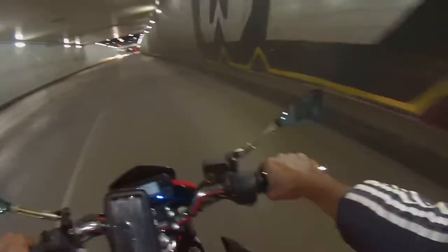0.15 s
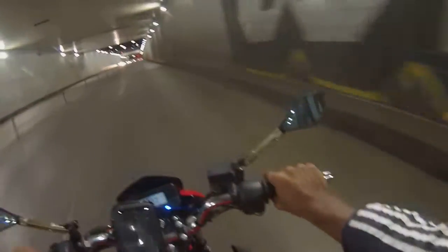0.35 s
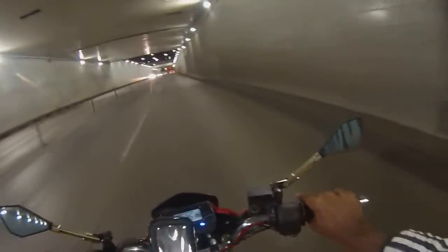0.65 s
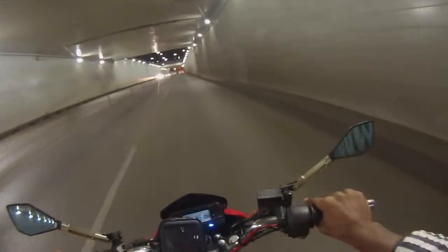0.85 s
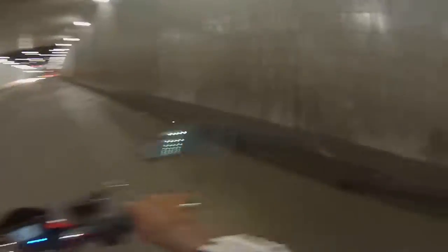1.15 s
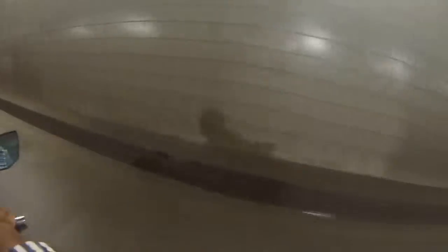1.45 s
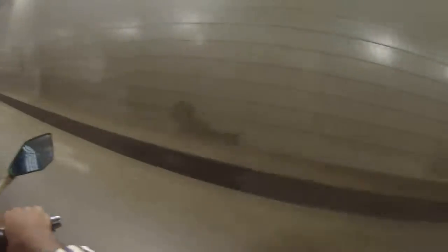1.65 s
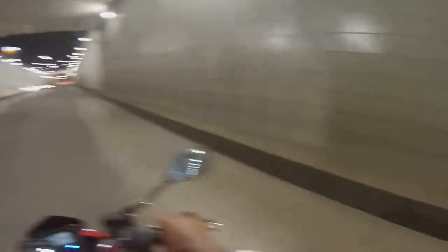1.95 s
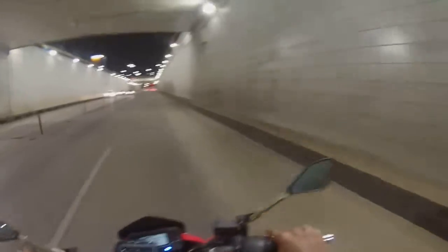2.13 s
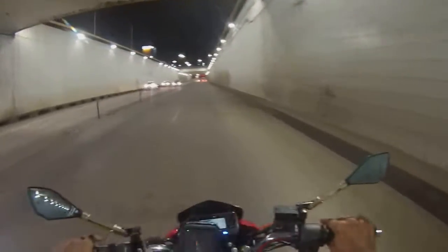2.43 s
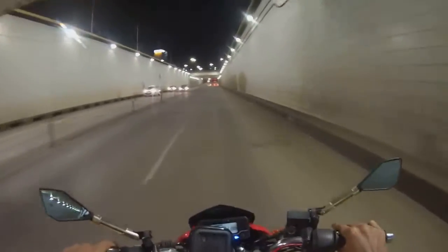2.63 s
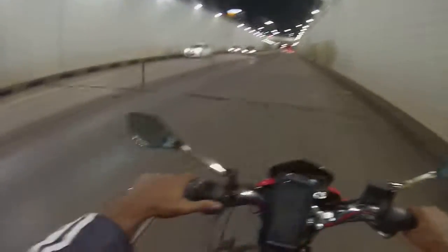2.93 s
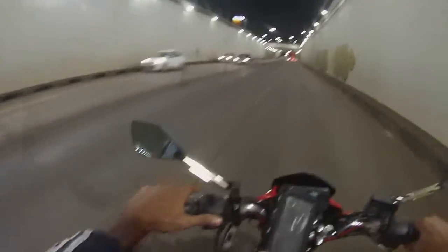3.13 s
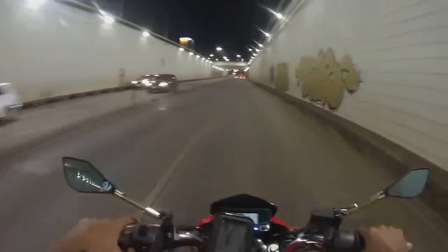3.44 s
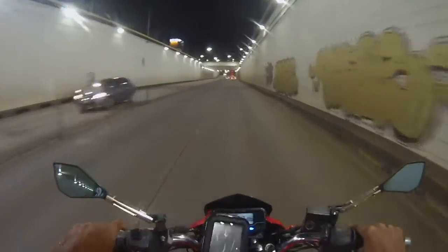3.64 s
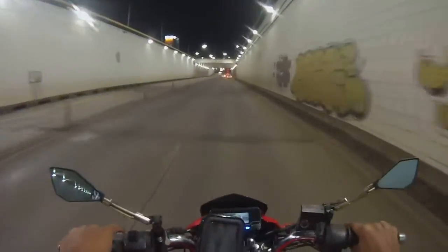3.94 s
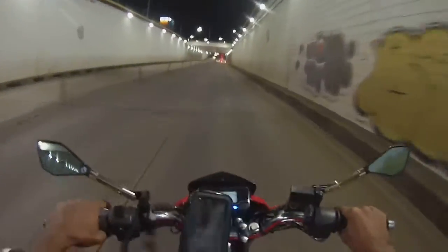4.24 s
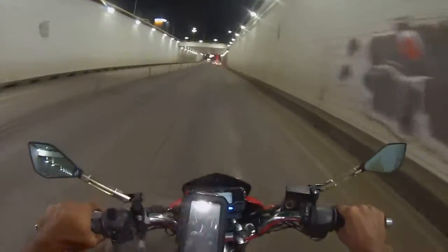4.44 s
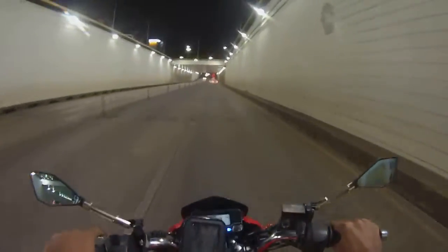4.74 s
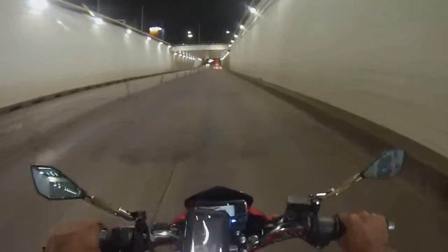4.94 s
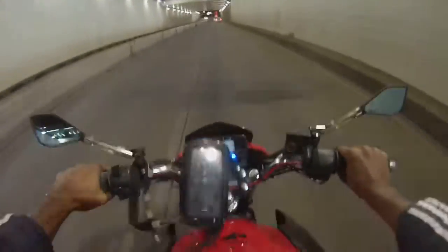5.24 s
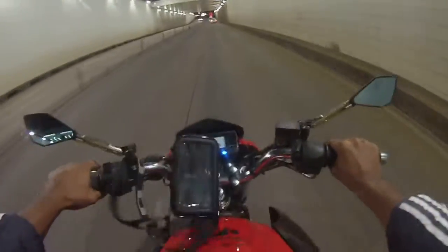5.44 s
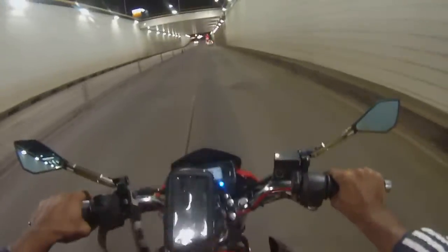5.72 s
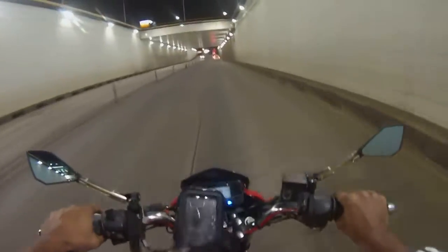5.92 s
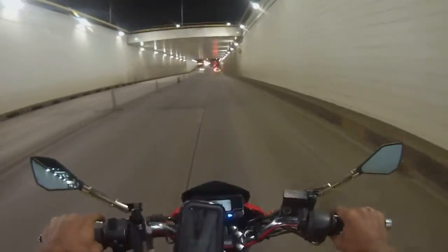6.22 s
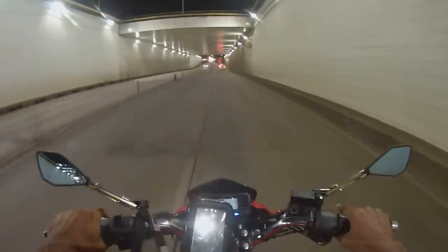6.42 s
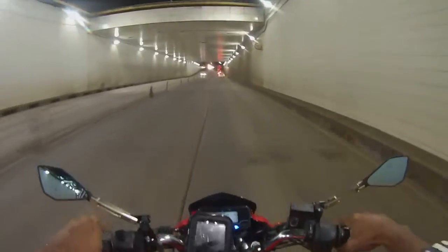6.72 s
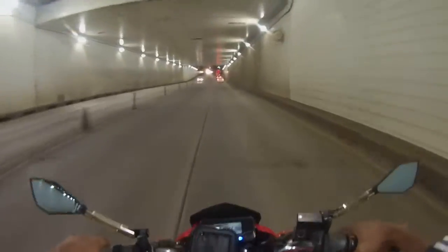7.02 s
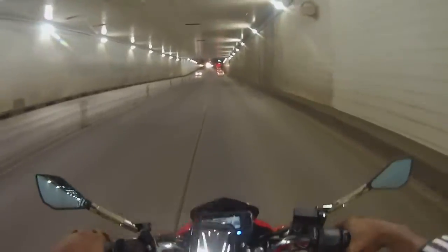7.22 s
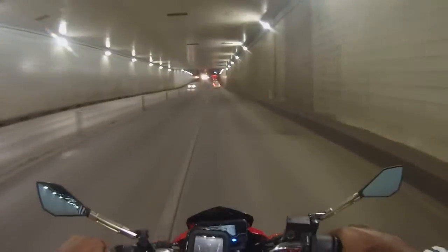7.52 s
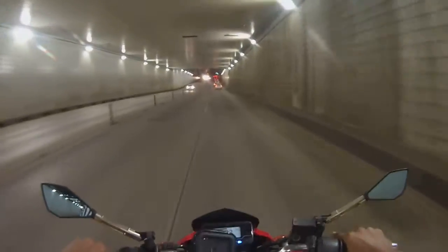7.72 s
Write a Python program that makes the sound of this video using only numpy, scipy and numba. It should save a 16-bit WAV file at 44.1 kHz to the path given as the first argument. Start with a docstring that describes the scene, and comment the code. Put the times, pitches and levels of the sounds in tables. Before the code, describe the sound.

Close, bass-heavy, muffled ride sound: a throbbing exhaust dips, the throttle is blipped and the note swells for about a second before dropping again. Then it chugs along evenly, creeping only slightly higher. Faint valve clatter and thin gear whine sit beneath; from the third second strong gusts thump and crowd the enclosed microphone, pumping its level.

```python
"""A single-cylinder motorcycle in a walled underpass, heard by a helmet camera in a closed housing.
The firing rate sags, then the rider blips the throttle with the clutch in: 41 to 80 Hz by 0.8 s, held to 1.25 s,
back to 41 Hz by 1.9 s. He rides on at 40-46 Hz to the end. Exhaust harmonics ring the pipe and return from the walls.
Shaped noise makes faint valve gear, whine and roar throughout; strong low gusts crowd in from 2.6 s. Pulses make
the buffets and the camera's ticks; a fast level control ducks at each overload."""
import sys
import numpy as np
from scipy import signal
from scipy.fft import rfft, irfft
from scipy.io import wavfile
from scipy.ndimage import uniform_filter1d
from numba import njit

SR = 44100
rng = np.random.default_rng(int(sys.argv[2]) if len(sys.argv) > 2 else 0)


def wav_out(sig):
    """Save sig, one row per channel (or a flat mono array), as 16-bit PCM at SR to the path in sys.argv[1]."""
    wavfile.write(sys.argv[1], SR, np.round(np.clip(np.atleast_2d(sig).T, -1, 1) * 32767).astype(np.int16))


N = 347067


def undb(db):
    """Decibels to amplitude ratio."""
    return 10 ** (np.asarray(db) / 20)


def level(x, rms_db):
    """Scale to an RMS level."""
    return x * undb(rms_db) / np.sqrt(np.mean(x ** 2))


def curves(table):
    """Columns of a table joined by straight lines in time."""
    time_s, *columns = np.transpose(table)
    return [np.interp(np.arange(N) / SR, time_s, column) for column in columns]


def colour(x, points, size=8192):
    """Causal minimum-phase filter through (freq_hz, gain_db) points, built by folding the cepstrum."""
    freq_hz, gain_db = np.transpose(points)
    grid_hz = np.arange(size // 2 + 1) * SR / size + 1
    grid_db = np.interp(np.log(grid_hz), np.log(freq_hz), gain_db)
    cepstrum = irfft(np.log(undb(grid_db)))
    cepstrum[1:size // 2] *= 2
    cepstrum[size // 2 + 1:] = 0
    impulse = irfft(np.exp(rfft(cepstrum)))
    return signal.fftconvolve(x, impulse)[:N]


def ring(x, hz, width_hz):
    """One resonance, gain 1 at its centre."""
    return signal.lfilter(*signal.iirpeak(hz, hz / width_hz, SR), x)


def noise():
    """White noise, RMS near 1."""
    return rng.standard_normal(N)


def walk(rate_hz):
    """Random levels held 1 / rate_hz and slewed twice; spread near 1."""
    hold = int(SR / rate_hz)
    steps = np.repeat(rng.standard_normal(N // hold + 1), hold)
    return 1.824 * uniform_filter1d(uniform_filter1d(steps, hold), hold)[:N]


def ticks():
    """Camera ticks: sudden steps that relax at once and ring briefly near 2.8 kHz; faint ones fall at random."""
    # clearest ticks, most at loud peaks: start_s, peak_db (in the band around the knock)
    clear_ticks = [(0.0697, -43), (0.158, -44), (0.2274, -45), (0.251, -47), (0.3385, -48), (0.3943, -48),
                   (0.4329, -50), (0.4483, -50), (0.473, -44), (0.5882, -50), (0.6267, -47), (0.6428, -48),
                   (0.6857, -48), (0.7124, -47), (0.8031, -48), (0.819, -48), (0.8427, -48), (0.8928, -48),
                   (0.9051, -47), (1.0195, -46), (1.1446, -44), (1.209, -47), (1.246, -48), (1.2892, -44),
                   (1.2993, -49), (1.3137, -48), (1.3514, -47), (1.3771, -47), (1.4021, -47), (1.6093, -49),
                   (1.7059, -49), (1.7819, -47), (1.8027, -50), (1.8621, -48), (1.9045, -43), (1.9826, -49),
                   (2.0077, -46), (2.089, -47), (2.1567, -49), (2.1781, -45), (2.1922, -48), (2.2731, -40),
                   (2.3229, -50), (2.5194, -47), (2.5422, -45), (2.6415, -41), (2.6722, -50), (2.6895, -40),
                   (2.6975, -48), (2.809, -49), (2.8573, -39), (3.1886, -50), (3.2398, -49), (3.4556, -49),
                   (3.5265, -43), (3.5513, -48), (3.7166, -41), (4.0205, -48), (4.0673, -47), (4.1344, -49),
                   (4.1837, -46), (4.1928, -49), (4.389, -47), (4.4035, -47), (4.4559, -47), (4.5288, -48),
                   (4.5644, -44), (4.5892, -45), (4.6879, -48), (4.7799, -49), (4.8017, -48), (4.8245, -45),
                   (4.8466, -43), (4.9149, -48), (4.9803, -41), (5.0016, -47), (5.0296, -49), (5.0705, -42),
                   (5.1158, -45), (5.138, -42), (5.227, -37), (5.32, -50), (5.3478, -46), (5.4007, -44),
                   (5.4295, -37), (5.4716, -46), (5.4925, -44), (5.511, -48), (5.7559, -41), (5.8256, -48),
                   (5.8441, -46), (5.9538, -48), (5.9741, -43), (5.9977, -47), (6.0385, -49), (6.1911, -44),
                   (6.2643, -45), (6.3723, -46), (6.4569, -47), (6.5312, -49), (6.5807, -46), (6.6255, -50),
                   (6.6673, -44), (6.7784, -46), (6.7981, -49), (6.8457, -47), (6.8663, -42), (6.983, -49),
                   (6.9987, -49), (7.0449, -42), (7.1005, -49), (7.133, -46), (7.3086, -47), (7.3514, -50),
                   (7.4382, -49), (7.5553, -46), (7.6008, -47), (7.7698, -46), (7.791, -44), (7.8396, -42)]
    faint_count, faint_min_db, faint_max_db = 110, -61.5, -55.5
    decay_s, knock_hz, knock_width_hz, edge_share = 0.00025, 2800, 3200, 0.45
    band_hz = 1500  # width of each of two resonances in which peaks are given

    hits = np.zeros(N)
    start_s, peak_db = np.transpose(clear_ticks)
    hits[(start_s * SR).astype(int)] = undb(peak_db) * rng.choice([-1, 1], len(start_s))
    faint_at = (rng.random(faint_count) * N).astype(int)
    hits[faint_at] += undb(rng.uniform(faint_min_db, faint_max_db, faint_count))

    t = np.arange(-100, 100) / SR
    step = np.sign(t) * np.exp(-abs(t) / decay_s)
    knock = ring(step, knock_hz, knock_width_hz) + edge_share * step
    core = ring(ring(knock, knock_hz, band_hz), knock_hz, band_hz)
    return np.convolve(hits, knock / abs(core).max(), "same")


def wind():
    """Low gusts and a flickering roar of coloured noise, and sudden buffets that push on the housing."""
    # low wind spectrum: freq_hz, relative_db
    gust_colour = [(7.1, -36), (12, -4), (75, 6), (110, -1.5), (140, -39), (240, -120)]
    # wind and tyres between the walls, spectrum: freq_hz, relative_db
    roar_colour = [(24, -37.5), (40, -16), (81, -6.5), (162, -2.5), (197, 0), (266, -5), (429, -1),
                   (465, -6), (799, -29.5), (1640, -43.5), (1800, -48), (2340, -85), (3960, -120)]
    # roar in time: time_s, rms_db
    roar_curve = [(0.0, -19), (0.2, -15.5), (0.45, -16.5), (0.7, -13), (1.1, -14.5), (1.5, -15.5),
                  (1.85, -18.5), (2.2, -13.5), (2.54, -11.5), (2.85, -17), (3.12, -12), (3.4, -10.5),
                  (3.62, -13.5), (3.9, -14.5), (4.25, -16.5), (4.6, -14), (5.1, -14), (5.6, -13.5),
                  (6.05, -13), (6.6, -14), (6.8, -15), (7.25, -14), (7.87, -11)]
    # strong low gusts: crest_s, rms_db at the crest, added to the steady wind
    strong_gusts = [(0.0, -20), (2.62, -21), (2.72, -17), (2.92, -19), (3.22, -20), (3.4, -23), (3.62, -20),
                    (3.73, -15), (3.85, -21), (4.2, -18), (4.5, -24), (4.82, -22), (5.12, -20), (6.03, -20),
                    (6.52, -19), (6.83, -21), (7.04, -19), (7.13, -18), (7.8, -17)]
    # buffets: crest_s, push_db
    buffets = [(0.249, 0), (0.394, 1.5), (1.907, 3), (2.005, 3), (2.272, -1), (2.69, 4), (2.858, -3),
               (3.527, -3), (3.718, 4), (4.183, 1), (4.296, -5), (4.589, -1), (5.137, -1), (5.227, -1),
               (5.428, 0), (5.515, 2), (5.756, -5), (6.193, 0), (6.264, -8), (6.667, 2), (6.866, -3),
               (7.044, -4.5), (7.131, 3), (7.789, -4), (7.839, 3)]
    steady_db, flicker_db, swell_s = -32, 4, 0.054  # swell_s: half length to 1/e
    buffet_hz = 173

    t = np.arange(N) / SR
    swells = sum(undb(db) * np.exp(-((t - crest_s) / swell_s) ** 2) for crest_s, db in strong_gusts)
    steady = undb(steady_db + flicker_db * walk(30.0))
    gusts = level(colour(noise(), gust_colour), 0) * (steady + swells)

    flickering = noise() * undb(1.4 * walk(25.0))
    roar = level(colour(flickering, roar_colour), 0) * undb(curves(roar_curve)[0])

    pushes = np.zeros(N)
    crest_s, push_db = np.transpose(buffets)
    pushes[(crest_s * SR).astype(int)] = undb(push_db)
    cycles = np.arange(-600, 600) / SR * buffet_hz
    # one crest of pressure between two shallow troughs
    buffet = np.cos(2 * np.pi * cycles) * np.exp(-(cycles / 0.5) ** 2)
    return gusts + roar + signal.fftconvolve(pushes, buffet, "same")


def rattle(turns):
    """Valve gear hiss bursting and tapping at each firing, ringing covers, and a thin gear whine."""
    # mechanical noise in time: time_s, rattle_db, whine_db, covers_lift_db
    rattle_curve = [(0.0, -49.5, -81, 2), (0.3, -52.5, -84, -6), (0.5, -49.5, -81, 4.5),
                    (0.85, -52, -76, 11), (1.05, -52.5, -75.5, 12), (1.17, -52, -72, 13),
                    (1.3, -49.5, -70, 15), (1.45, -54.5, -70, 17.5), (1.6, -52.5, -77, 10.5),
                    (1.85, -50.5, -73, 9), (1.95, -52.5, -71.5, -2), (2.6, -49, -72.5, -1.5),
                    (3.0, -52, -70.5, -2), (3.8, -53, -73, 0), (4.02, -50, -62, 2), (4.2, -53, -73, -1),
                    (4.8, -50, -61, 0.5), (5.1, -48, -68, -4), (5.6, -50.5, -78.5, -2),
                    (6.0, -47.5, -69, -2), (6.25, -51.5, -71.5, 0.5), (6.55, -50, -63, -1),
                    (6.75, -52.5, -65, 1), (6.95, -54.5, -82, 1), (7.87, -51, -74, 1)]
    # what the housing passes above the bass: freq_hz, relative_db
    housing = [(530, -26.5), (900, -7.5), (1140, -21), (1540, -6), (1820, -14), (2090, -4), (2950, -21.5),
               (3440, -19.5), (4260, -12), (4600, -16), (5410, -16.5), (6790, -24.5), (8070, -24),
               (8890, -33), (11900, -35.5), (15500, -66.5), (22000, -120)]
    # ringing engine covers: freq_hz, width_hz, level_db (re hiss, before the lift)
    cover_rings = [(2060, 80, -22), (2270, 100, -21), (4050, 100, -23), (4310, 110, -18), (4850, 600, -21),
                   (8050, 400, -29), (11300, 1200, -36)]
    tap_hz, tap_width_hz, tap_db, tap_decay_cycles = 9500, 11000, -19.5, 0.061  # tap_db re hiss
    whine_hz, whine_width_hz = 5310, 45

    rattle_db, whine_db, covers_lift_db = curves(rattle_curve)
    cycle = turns % 1
    beat = (1 + 1.1 * np.exp(-cycle / 0.06)) * undb(0.9 * walk(15.0))
    hiss = level(colour(noise() * beat, housing), 0)
    covers = sum(level(ring(noise() * beat, hz, width_hz), db) for hz, width_hz, db in cover_rings)
    covers = covers * undb(covers_lift_db)

    taps = noise() * np.exp(-cycle / tap_decay_cycles) * undb(3.0 * walk(27.0))
    taps = ring(ring(taps, tap_hz, tap_width_hz), tap_hz, tap_width_hz)
    taps = level(taps, tap_db)

    whine = level(ring(noise(), whine_hz, whine_width_hz), 0)
    return (hiss + covers + taps) * undb(rattle_db) + whine * undb(whine_db)


@njit
def walls(x, lags, gain, damp):
    """Wall echoes: eight delay lines that feed each other, duller on every round."""
    line, soft, out = np.zeros((8, 8192)), np.zeros(8), np.zeros(len(x))
    for i in range(len(x)):
        total = 0.
        for k in range(8):
            soft[k] += (1 - damp) * (gain[k] * line[k, (i - lags[k]) & 8191] - soft[k])
            total += soft[k]
        out[i] = total
        for k in range(8):
            line[k, i & 8191] = x[i] + soft[k] - total / 4
    return out


def exhaust(turns, firing_hz, pipe_db, boom_hz, boom_db, upper_db):
    """Pipe harmonics of the firing rate, in step to form one pulse a cycle; no two firings are alike."""
    # pipe response: freq_hz, gain_db
    pipe = [(30, -17), (50, -13), (80, -5.5), (130, 0), (175, -0.5), (250, -6.5), (300, -2), (350, -7),
            (400, -5), (450, 2), (500, -7), (560, -17.5), (640, -23.5), (800, -30.5), (1000, -46.5)]
    # the crank turns twice per firing and shakes more with revs; harmonic: db_per_octave above cruising
    shake = {1: 3, 2: 2, 3: -3, 4: 6, 5: 4, 6: 3}
    cruise_hz = 44
    boom_width_hz, upper_hz, upper_width_hz = 30, 433, 68  # half widths to 1/e of the dB lift

    pipe_freq_hz, pipe_gain_db = np.transpose(pipe)
    size = undb(1.3 * rng.standard_normal(N // 400))[turns.astype(int)]
    size = uniform_filter1d(size, SR // 200)
    wobble = turns + 0.004 * walk(25.0)
    pulses = 0
    for k in range(1, 19):
        hz = k * firing_hz
        db = pipe_db + np.interp(np.log(hz), np.log(pipe_freq_hz), pipe_gain_db)
        db += 1.9 * min(k / 8, 1) * walk(12.0)
        db += shake.get(k, 0) * np.log2(firing_hz / cruise_hz)
        # one low region booms between the walls and moves with revs and load
        db += boom_db * np.exp(-((hz - boom_hz) / boom_width_hz) ** 2)
        db += upper_db * np.exp(-((hz - upper_hz) / upper_width_hz) ** 2)
        # the pipe delays upper harmonics, drawing the pulse out; shifting echoes scramble them most
        delay_rad = (0.14 + 0.01 * walk(20.0)) * k * k
        pulses = pulses + undb(db) * np.sqrt(2) * np.cos(2 * np.pi * k * wobble - delay_rad)
    return pulses * size


@njit
def ducker(x, ceiling, down, up):
    """Pulls the gain down fast while the output is over the ceiling, then lets it creep back to full."""
    y, gain = np.empty(len(x)), 1.
    for i in range(len(x)):
        gain = gain * down if abs(x[i] * gain) > ceiling else min(gain * up, 1.)
        y[i] = x[i] * gain
    return y


def scene():
    """Engine with its wall echoes, mechanical rattle and wind."""
    # engine: time_s, firing_hz, pipe_db, boom_hz, boom_lift_db, upper_lift_db (lift of the harmonics near 433
    # Hz)
    engine_curve = [(0.0, 47.5, -9.5, 155, 5, -5.5), (0.13, 44.7, -25, 155, 8.5, -8),
                    (0.23, 41.32, -23, 166, 15.5, -3.5), (0.31, 40.79, -26.5, 169, 13, -1),
                    (0.4, 45.3, -21, 200, 4.5, 6.5), (0.52, 55.4, -19.5, 222, 3.5, 3),
                    (0.63, 66.24, -21, 266, 6, 9), (0.79, 79.46, -21.5, 316, 5.5, -1),
                    (1.25, 79.73, -19.5, 311, -2.5, 3), (1.36, 77.47, -20, 308, -4, 6.5),
                    (1.5, 70.9, -21, 293, 12.5, -5.5), (1.67, 61.64, -20.5, 185, 6, 5.5),
                    (1.8, 51.33, -23, 163, 14, -1), (1.92, 40.91, -23, 163, 15.5, -2.5),
                    (2.15, 42.93, -24, 203.1, 11, 4), (2.3, 40.3, -23.5, 194.9, 11.5, -3.5),
                    (3.15, 41.83, -23, 210, 10, -3.5), (4.43, 43.59, -22, 219.6, 10.5, -1),
                    (5.04, 44.78, -18, 225.9, 5.5, -2), (5.4, 45.17, -20, 219.2, 5, -1.5),
                    (6.07, 45.9, -20, 223.7, 7, 0), (6.4, 46.41, -21, 223.4, 6.5, 2.5),
                    (6.72, 46.42, -22.5, 226.3, 11.5, -5.5), (6.84, 45.6, -22.5, 183, 9.5, -4.5),
                    (7.05, 45.78, -30, 178, 12.5, -2), (7.36, 44.63, -21.5, 178.3, 9, -7),
                    (7.87, 45.29, -19.5, 179.3, 3.5, -7)]
    wall_t60_s, wall_damp, wall_db = 0.86, 0.86, -24  # t60 before damping

    firing_hz, *controls = curves(engine_curve)
    turns = np.cumsum(firing_hz) / SR  # firing cycles
    engine = exhaust(turns, firing_hz, *controls)
    lags = rng.integers(700, 4000, 8)
    echo = walls(engine, lags, undb(-60 * lags / SR / wall_t60_s), wall_damp)
    return (engine + undb(wall_db) * echo + rattle(turns) + wind())[None]


def record(dry):
    """Camera: peaks duck, overshoots are rounded, deepest bass is cut, ticks join, the top is cut."""
    ceiling, duck_db_s, recover_db_s, full_scale = 0.78, 2000.0, 110.0, 1.25
    low_cut_hz, top_hz, output_db = 14, 12300, -3.5

    held = ducker(dry[0], ceiling, float(undb(-duck_db_s / SR)), float(undb(recover_db_s / SR)))
    held = held / (1 + (held / full_scale) ** 8) ** (1 / 8)
    low_cut = signal.butter(1, low_cut_hz, "high", fs=SR, output="sos")
    held = signal.sosfilt(low_cut, held)
    top_cut = signal.ellip(8, 0.2, 70, top_hz, fs=SR, output="sos")
    return signal.sosfilt(top_cut, held * undb(output_db) + ticks())[None]


dry = scene()
out = record(dry)
wav_out(out)
```